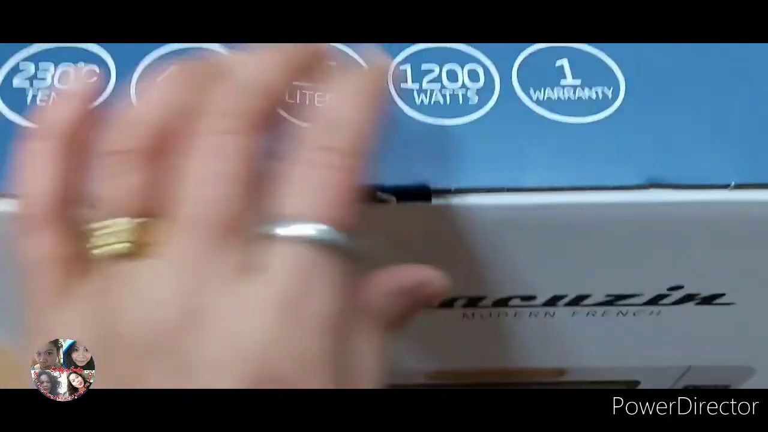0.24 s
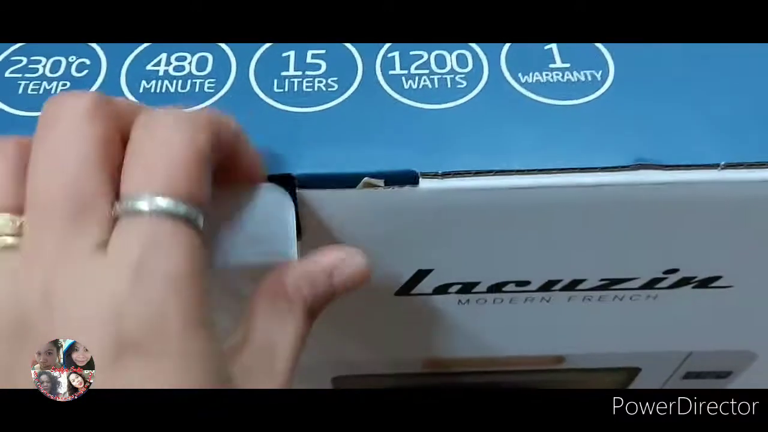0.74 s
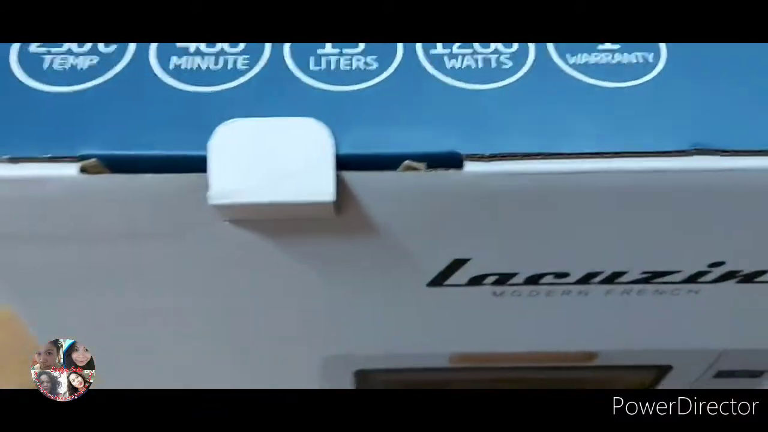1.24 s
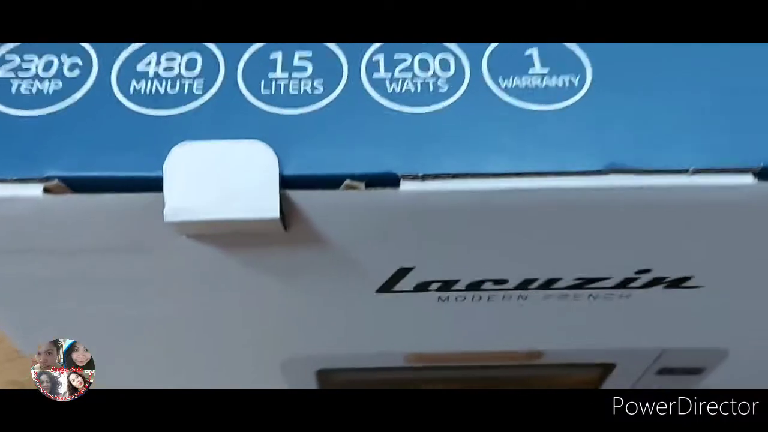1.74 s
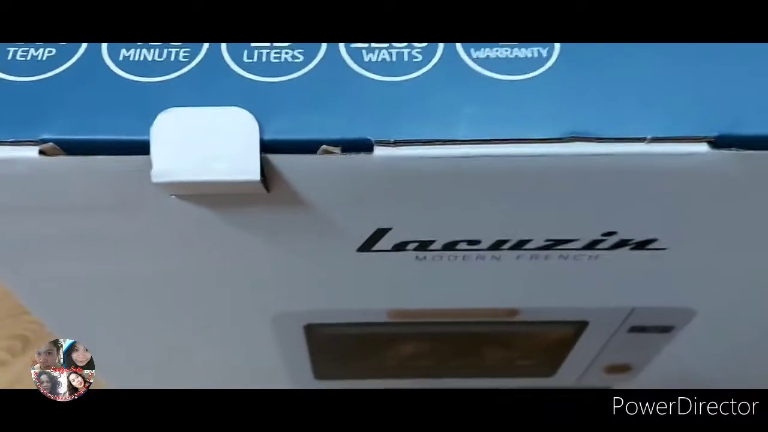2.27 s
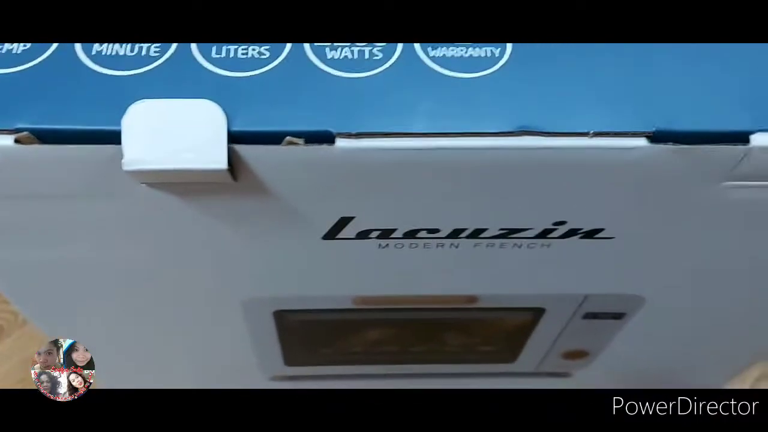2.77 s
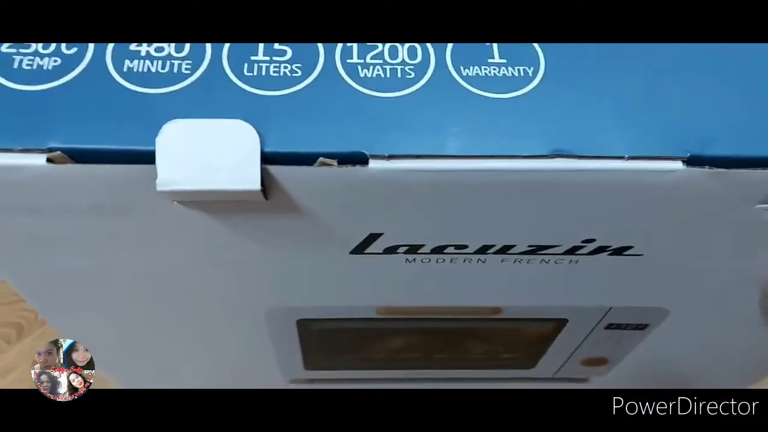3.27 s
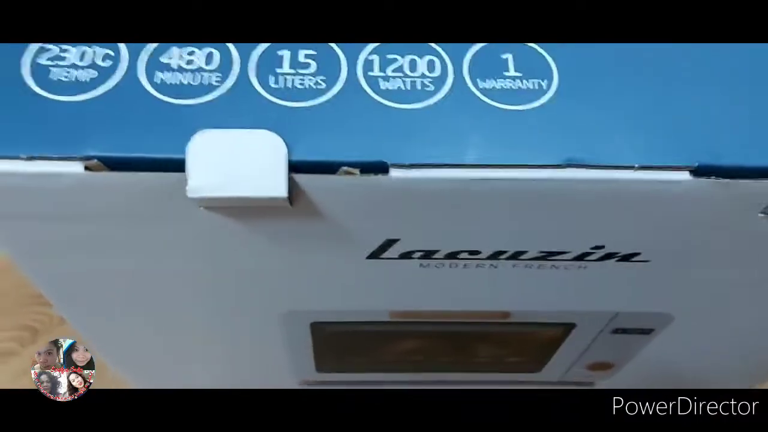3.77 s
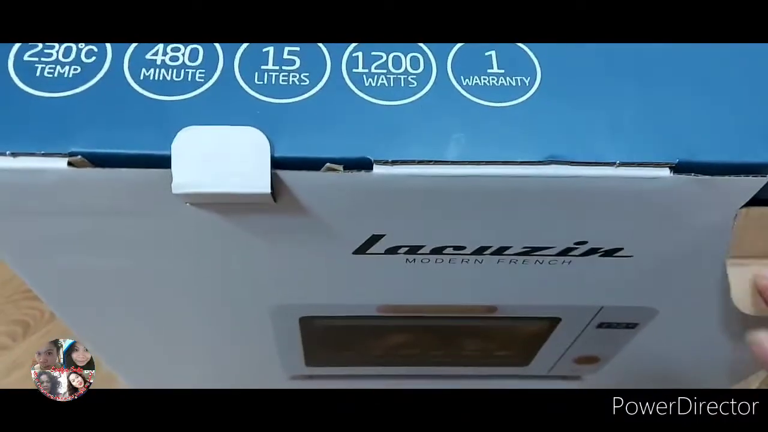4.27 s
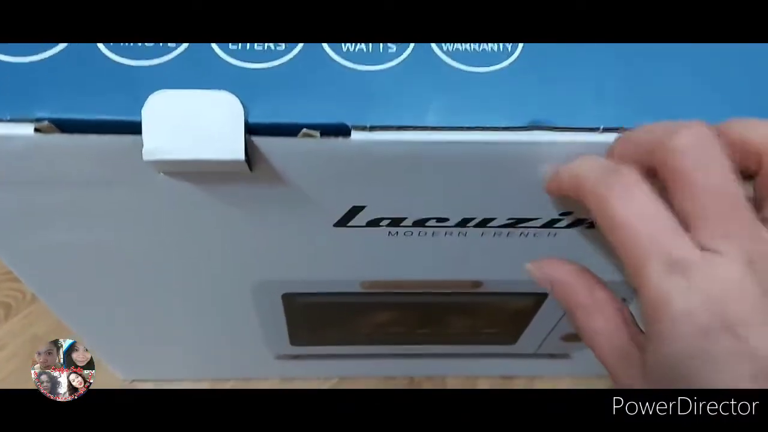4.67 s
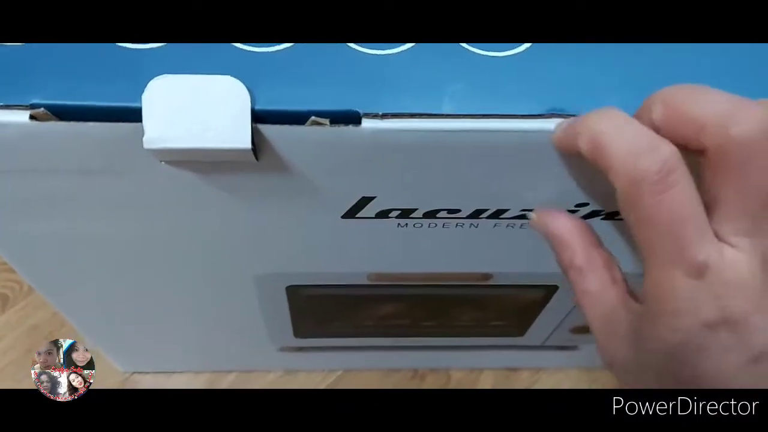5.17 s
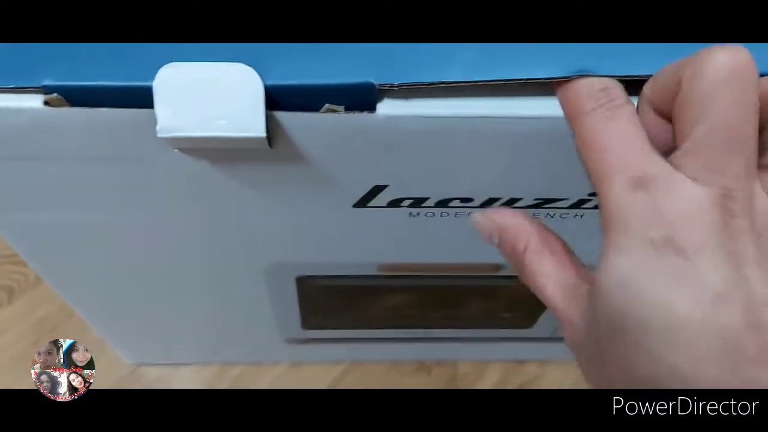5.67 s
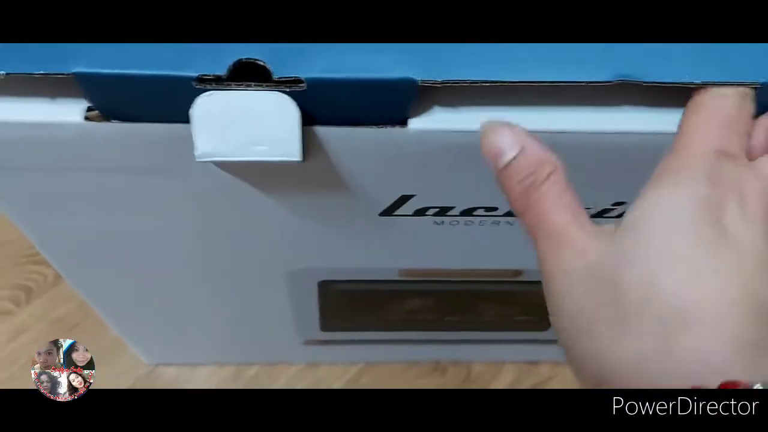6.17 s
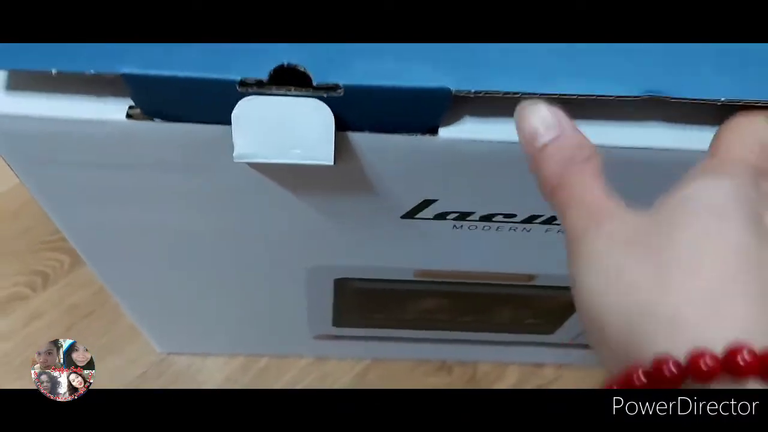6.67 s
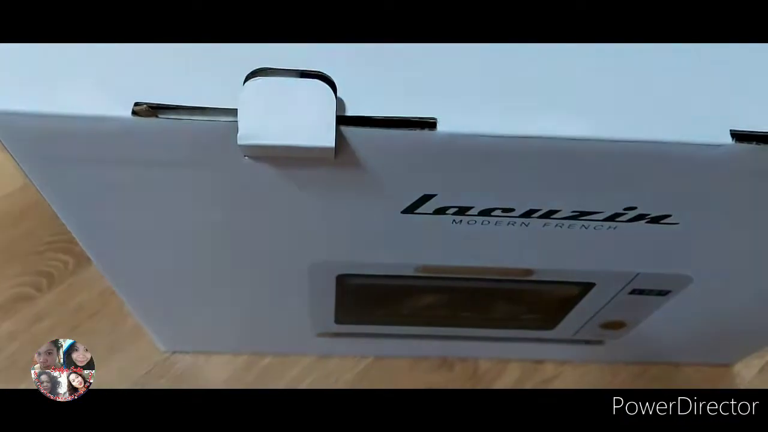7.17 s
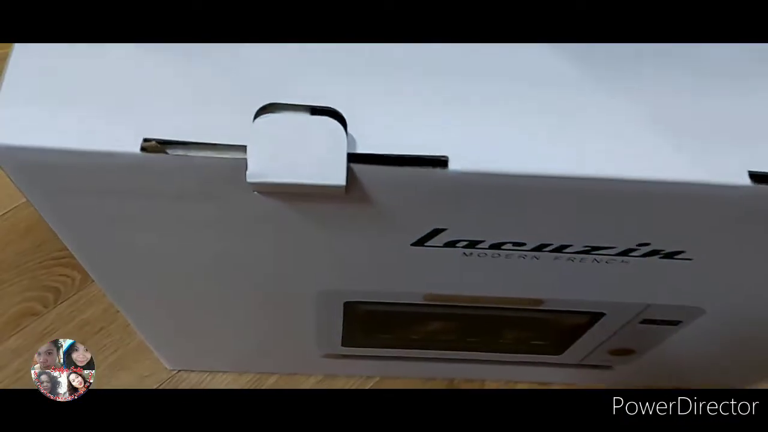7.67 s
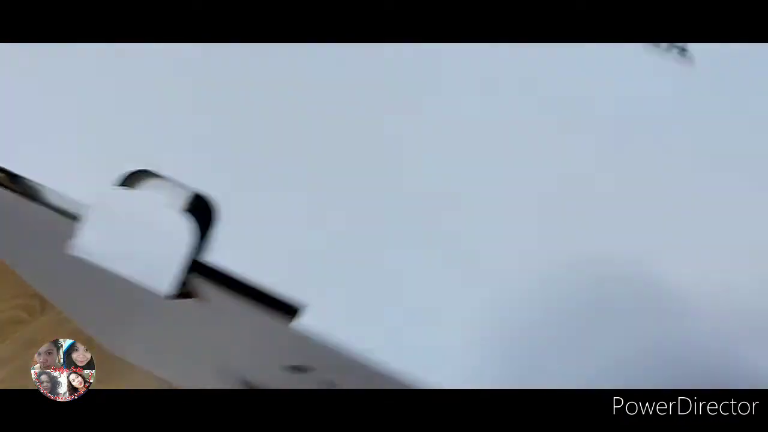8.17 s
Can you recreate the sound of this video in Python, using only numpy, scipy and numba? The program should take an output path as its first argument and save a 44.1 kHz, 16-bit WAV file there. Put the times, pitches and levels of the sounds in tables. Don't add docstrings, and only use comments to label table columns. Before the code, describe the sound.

Close phone pickup in a small, quiet, slightly live room with faint hiss. At 0 s a dull knock and sharp crack hit a hollow cardboard box, fading quickly; a small click follows at 0.2. From 0.8 to 1.1 s a low thump, papery rubbing and several crisp snaps free a tab. Then it is mostly quiet until 3.2: faint rubbing, creases, tiny fold clicks and soft wall pops. At 3.3-3.6 cracks build to a loud tearing snap, hollow knock and scrape; smaller knocks, a dry click and a bright chirp follow until 4.3. Very soft handling lasts until about 5.6. Hard cracks at 5.75-5.95 bring a lid chirp, low groan and booming panels. Lighter rubs and knocks continue, then from 6.9 to 8 come frequent snaps, gritty rasps and low thuds. A long bright drag from 8.2 ends with two quick snaps near 8.4.

```python
import sys
import numpy as np
from scipy import signal
from scipy.fft import rfft, irfft
from scipy.io import wavfile
from scipy.ndimage import uniform_filter1d
from numba import njit

SR = 44100
rng = np.random.default_rng(int(sys.argv[2]) if len(sys.argv) > 2 else 0)


def gain_from_db(level_db):
    decades = np.asarray(level_db, float) / 20
    return 10 ** decades


def transcribe(signal):
    frames = np.atleast_2d(signal).T
    limited = np.clip(frames, -1, 1)
    pcm = np.round(limited * 32767).astype(np.int16)
    wavfile.write(sys.argv[1], SR, pcm)


N = 371763


def unit(x):
    return x / np.sqrt(np.mean(x ** 2))


def curves(table):
    s, *columns = np.transpose(table)
    return [np.interp(np.arange(N) / SR, s, c) for c in columns]


def band(x, hz, width_hz):
    b, a = signal.iirpeak(min(hz, .45 * SR), hz / width_hz, SR)
    return signal.lfilter(b, a, x)


@njit
def moving_band(x, hz, k):
    y, band_state, low_state = np.empty(len(x)), 0., 0.
    for i in range(len(x)):
        g = np.tan(np.pi * hz[i] / SR)
        v = (band_state + g * (x[i] - low_state)) / (1 + g * (g + k))
        band_state = 2 * v - band_state
        low_state += 2 * g * v
        y[i] = k * v
    return y


def body(x, modes):
    out = 0
    for k, (hz, width_hz, db) in enumerate(modes):
        out = out + (-1) ** k * gain_from_db(db) * band(x, hz, width_hz)
    return out


def slips(rate_hz, spread_db):
    when = rng.random(N) < rate_hz / SR
    strength_db = spread_db * np.minimum(rng.exponential(size=N), 3)
    return unit(when * rng.standard_normal(N) * gain_from_db(strength_db))


def flicker(rate_hz):
    k = int(SR / rate_hz)
    held = np.repeat(rng.standard_normal(N // k + 1), k)
    return 1.08 * uniform_filter1d(held, k)[:N]


def patchy(x, modes, patchy_db):
    out = 0
    for hz, width_hz, db in modes:
        struck = x * rng.choice([-1, 1], N)
        ring = band(band(struck, hz, width_hz), hz, 3 * width_hz)
        out = out + gain_from_db(db + patchy_db * flicker(18)) * ring
    return unit(out)


def strokes(rows, linger, resting_db):
    t = np.arange(0, N + 64, 64) / SR
    s, db, rise_s, fall_s = np.transpose(rows)[:, :, None]
    slope = np.where(t < s, (s - t) / np.abs(rise_s), (t - s) / np.abs(linger * fall_s))
    power = np.sum(gain_from_db(db - 20 * slope ** 1.13) ** 2, axis=0) + gain_from_db(resting_db) ** 2
    return np.interp(np.arange(N) / SR, t, np.sqrt(power))


def spread(x, other, alike):
    port_lag_s = .00012
    alike = np.clip(alike, 0, 1)
    return np.array([np.roll(x, int(port_lag_s * SR)), alike * x + np.sqrt(1 - alike ** 2) * other])


def pan(db):
    return gain_from_db(np.array([db, -db]) / 2)


def add(out, s, sound):
    i = int(s * SR)
    out[..., i:i + sound.shape[-1]] += sound[..., :N - i]


# (frequency [Hz], density [dB per Hz])
AIR_SPECTRUM = [(18, -36.5), (206, -16), (388, -1), (547, -13.5), (953, -10.5), (1620, -34), (7280, -14.5),
                (15000, -41)]


def air():
    level_db = -71
    hz = np.fft.rfftfreq(N, 1 / SR) + 1
    table_hz, table_db = np.transpose(AIR_SPECTRUM)
    gain = gain_from_db(np.interp(np.log(hz), np.log(table_hz), table_db))
    mid, side = rfft(rng.standard_normal((2, N))) * gain
    side = side * np.minimum(hz / 1200, 1)
    return unit(irfft(np.array([mid + side, mid - side]), N)) * gain_from_db(level_db)


# (time [s], peak level [dB], pitch [Hz])
KNOCKS = [(0.009, -21, 270), (0.63, -46, 90), (0.813, -26, 82), (3.536, -16, 295), (3.866, -38.5, 352),
          (3.944, -26.5, 159), (4.195, -30.5, 386), (5.275, -31.5, 366), (5.849, -22, 408),
          (5.934, -22.5, 401), (6.213, -33, 81.6), (6.425, -32, 205), (6.488, -34, 716), (6.64, -37.5, 576),
          (6.87, -29, 447), (7.083, -24, 125), (7.305, -24.5, 58), (7.005, -33, 55), (7.118, -28, 65),
          (7.148, -30, 72), (7.565, -27, 205), (7.572, -29, 95), (7.7, -32, 60), (7.775, -30, 130),
          (7.868, -26, 54), (7.522, -22.5, 309), (7.737, -18, 284.5), (7.852, -27, 113),
          (7.975, -34.5, 576)]


def knocks():
    out, t = np.zeros(N), np.arange(SR // 4) / SR
    attack = 1 - np.exp(-t / 0.00043)
    for s, db, hz in KNOCKS:
        ring_s = 0.085 + 4 / hz
        fade = np.exp(-np.log(1000) * t / ring_s) * attack
        modes = np.sin(2 * np.pi * hz * t) + 0.33 * np.sin(2 * np.pi * 1.5 * hz * t)
        add(out, s + 0.00263, gain_from_db(db - 3.5) * fade * modes)
    return out


# (time [s], free flap resonance [Hz], left minus right [dB])
GRIP = [(0.0, 2990, 0.5), (0.84, 2884, 0), (1.03, 5470, -0.6), (1.55, 3510, 4), (1.78, 5070, 12),
        (2.42, 3460, -3), (3.31, 5210, 9.5), (3.75, 3250, 4), (4.65, 3170, 8), (4.81, 5240, 8.5),
        (6.4, 3015, 6.5), (6.86, 5420, 5.5), (7.32, 1818, 2.5), (8.2, 4610, 6)]


def grip():
    return curves(GRIP)


# (time [s], peak level [dB], colour [Hz], panel share [dB], left minus right [dB])
TICKS = [(5.7514, -16, 6940, -25, 8.9), (5.8518, -3.5, 5700, -11, 6.1), (5.291, -36, 6000, -15, 6),
         (5.667, -26, 3000, -8, 5), (6.0745, -30, 2500, -2, 4), (6.445, -30, 2000, 2, 4),
         (6.677, -36, 7000, -20, 6), (6.63, -41, 7000, -20, 6), (0.9168, -29, 3280, -4.5, -9),
         (1.0095, -12, 6900, -9.5, -0.5), (1.0845, -6, 6300, -18, 0), (2.174, -40, 2500, -14, 0),
         (2.548, -42, 1800, -14, 0), (3.759, -40, 11000, -30, 4), (4.1235, -41, 9000, -30, 5),
         (6.9195, -22, 5500, -20, 6), (3.556, -14, 4500, -20, 6), (3.2445, -31, 3370, -20.5, 4),
         (3.3369, -11, 6200, -35, 8), (3.4234, -22, 6920, -11, 17.5), (3.5184, -14.5, 6390, -23, -5),
         (6.4915, -26.5, 2530, 2, 7), (8.383, -13, 5640, -19, 6), (8.391, -12, 7000, -19, 6)]
# (time [s], peak level [dB], colour [Hz], panel share [dB], left minus right [dB])
CRACKS = [(0.8123, -26, 7800, -12, 0), (7.722, -34, 9000, -25, 3), (3.5054, -8.5, 7500, -25, 9),
          (6.901, -11, 9250, -22, 8), (1.0785, -20, 1500, 0, 0), (1.0633, -28, 7400, -8, 1.5),
          (3.8776, -32, 8130, -25, 2), (7.2745, -25, 1800, -12, 3.5), (7.1034, -22, 2500, -12, 4),
          (7.132, -25, 4700, -14, 4), (0.0237, -8, 4650, -8.5, 1.7), (0.85, -24, 3570, -12, 6.8),
          (3.3764, -28.5, 7960, -16, 5), (3.4, -21.5, 4870, -8, 3.3), (3.8304, -30, 4230, -46, 1.6),
          (5.9714, -15.5, 2500, -7.5, 3.3), (5.9864, -17.5, 5060, -22, 7), (7.2994, -19.5, 7400, -17, 5),
          (7.7385, -24, 5130, -2, 2.7), (7.8413, -25, 6070, -12.5, 3)]
# (time [s], peak level [dB], colour [Hz], panel share [dB], left minus right [dB])
TEARS = [
    (3.5418, -3.5, 5400, -11.5, 7.5),
    (4.2761, -25, 10560, -38, 7),
    (5.9279, -9.5, 2710, -9, 5.5),
    (6.1606, -24.5, 5340, -13.5, 12),
    (6.333, -30, 7140, -8, 6),
    (7.0963, -20, 2500, -12, 5),
    (7.9758, -20.5, 2500, -13, 3),
]
# (time [s], peak level [dB], panel share [dB])
CREASES = [(0.4823, -41.5, -50), (0.8699, -26.5, -4.5), (2.142, -34, -25), (2.612, -39.5, -19),
           (3.2704, -35, -4), (3.3223, -34.5, -4.5), (3.4484, -30, -14), (3.9496, -29, -19),
           (4.083, -43.5, 6), (4.5695, -36, -37), (4.7284, -41, 1), (4.8237, -43.5, 2), (5.2769, -35.5, -2),
           (5.3244, -34.5, -23), (6.4278, -33.5, -10), (5.375, -40, -25), (6.54, -39, -19),
           (6.5775, -31.5, -20), (0.6926, -47, -10), (0.759, -45, -10), (2.957, -46, -6),
           (3.1318, -46, -25), (3.2979, -38, -8), (3.7254, -42, -20), (3.7948, -45, -25),
           (4.2542, -32, -15), (6.843, -33, -12), (6.8709, -25, -8), (7.2451, -32, -10), (7.5185, -30, -8),
           (7.611, -32, -12), (8.0882, -31, -15) ]


def every_snap():
    flap_hz, pan_db = grip()
    creases = []
    for s, db, panel_db in CREASES:
        i = int(s * SR)
        creases.append((s, db, 1.13 * flap_hz[i], panel_db, pan_db[i]))
    kinds_ms = (TICKS, 1.05), (CRACKS, 1.75), (TEARS, 4), (creases, 1.9)
    return [(*row, ms) for rows, ms in kinds_ms for row in rows]


# (frequency [Hz], width [Hz], level [dB])
PANELS = [(308.4, 114, -7.5), (381, 59, -1), (603, 170, -11.5), (733, 60.4, -2), (810.5, 42.3, -4.5),
          (1042, 210, -10), (1414, 138, -12.5), (1730, 320, -19)]


def snaps():
    crack, blow = np.zeros((2, N)), np.zeros((2, N))
    t = np.arange(4096) / SR
    flutter_gain = gain_from_db([[-26], [-26], [-36], [-36]])
    for s, db, hz, panel_db, pan_db, ms in every_snap():
        age = t * 1000 / ms
        shape = age ** 1.3 * np.exp(-age * 1.05)
        flutter = flutter_gain * np.exp(-t / 0.03) * np.minimum(age, 1)
        burst = rng.standard_normal((4, len(t))) * (shape + flutter)
        burst[:, int(shape.argmax())] += 3.5 * shape.max()
        edge = burst[:2]
        tone = band(edge, hz, 0.31 * hz) + 0.12 * np.diff(edge, prepend=0) + 0.16 * edge
        tone = tone / np.abs(tone).max(axis=1)[:, None]
        recoil = spread(burst[2], burst[3], alike=0.8) / np.linalg.norm(burst[2])
        start_s = s - .0004 - ms * .0006
        add(crack, start_s, tone * gain_from_db(db - 1.0) * pan(pan_db)[:, None])
        add(blow, start_s, recoil * gain_from_db(db + panel_db))
    held = [(hz, 1.75 * width_hz, db) for hz, width_hz, db in PANELS]
    return crack + gain_from_db(43) * body(blow, held)


# (time [s], length [s], colour [Hz], level [dB])
RASPS = [(0.024, .025, 1000, -28), (0.03, .06, 2100, -40), (0.872, .035, 2000, -45),
         (6.489, .008, 950, -28), (2.2, .14, 1300, -63), (0.85, .02, 2100, -45), (0.915, .04, 2600, -48),
         (1.09, .04, 6000, -42), (1.66, .14, 1100, -65), (1.8, .14, 1300, -64), (2.71, .09, 1200, -67),
         (3.54, .05, 2100, -31), (3.832, .05, 4500, -49), (4.445, .1, 620, -64), (4.571, .06, 3100, -52),
         (5.325, .07, 4200, -55), (5.6, .08, 1700, -50), (5.925, .05, 1900, -33), (6.163, .05, 5500, -46),
         (6.94, .03, 4500, -42), (6.972, .03, 2700, -43), (7.095, .05, 2500, -37), (7.228, .03, 1200, -46),
         (7.26, .035, 2000, -40), (7.53, .06, 2200, -44), (7.61, .03, 2000, -45), (7.66, .04, 3800, -45)]
# (time [s], length [s], pitch [Hz], level [dB])
SCUFFS = [
    (3.539, 0.093, 2055, -33),
    (4.275, 0.01, 1450, -37.5),
    (4.829, 0.16, 800, -64),
    (5.208, 0.2, 384, -61.5),
    (5.923, 0.031, 1740, -25.5),
    (6.002, .11, 736, -35.5),
    (7.099, 0.093, 1380, -41.5),
    (7.268, 0.015, 1800, -39),
    (8.218, 0.25, 8000, -36),
]


def scuffs():
    out = np.zeros((2, N))
    for rows, share in ((SCUFFS, .097), (RASPS, .45)):
        for s, length_s, hz, db in rows:
            t = np.arange(SR // 4) / SR / length_s
            friction = rng.standard_normal((2, len(t)))
            sing = band(band(friction, hz, share * hz), hz, share * hz)
            shape = np.minimum(8 * t, 1) * np.exp(-2 * t ** 2)
            add(out, s, gain_from_db(db) * unit(spread(*sing, alike=500 / hz)) * shape)
    return out


# (peak time [s], panel level [dB], 20 dB rise [s], 20 dB fall [s], boom level [dB])
TAB_SHOVES = [(0.028, -26, 0.05, 0.08, -28), (0.2, -64, .1, 0.53, -62.5), (0.708, -58, 0.071, 0.084, -44),
              (0.833, -39.5, 0.054, 0.17, -35), (0.94, -40, 0.2, 0.18, -62),
              (1.088, -36.5, 0.12, .085, -39), (1.37, -75, 0.08, 0.55, -56.5),
              (1.57, -55.5, .035, .1, -44.5), (1.95, -65, 0.27, 0.095, -55), (2.24, -55, 0.15, 0.3, -60),
              (2.52, -60, 0.13, 0.16, -58), (2.75, -67, 0.15, .15, -75)]
# (peak time [s], panel level [dB], 20 dB rise [s], 20 dB fall [s], boom level [dB])
SIDE_SHOVES = [(2.97, -52.5, 0.028, .11, -48), (3.18, -58, 0.025, .04, -56), (3.337, -43, 0.091, 0.51, -47),
               (3.46, -39.5, 0.14, 0.15, -49), (3.556, -23, .02, .1, -29.5),
               (3.876, -75, 0.034, 0.085, -48.5), (3.954, -41.5, 0.0069, 0.089, -34.5),
               (4.046, -46.5, 0.11, 0.23, -49.5), (4.205, -65, 0.026, 0.074, -38),
               (4.27, -39, 0.048, 0.038, -59.5), (4.739, -47, 0.044, 0.1, -57),
               (4.849, -59.5, 0.13, 0.42, -67), (5.288, -47.5, .025, 0.12, -41.5)]
# (peak time [s], panel level [dB], 20 dB rise [s], 20 dB fall [s], boom level [dB])
LID_SHOVES = [(5.648, -29, 0.12, 0.17, -40.5), (5.87, -28, .015, 0.19, -49),
              (5.961, -24, 0.059, 0.14, -32.5), (6.221, -39.5, 0.18, 0.18, -43.5),
              (6.44, -41, 0.032, 0.35, -50.5), (6.66, -42, 0.05, 0.1, -45.5),
              (6.914, -31, 0.11, .12, -35.5), (7.1, -33, 0.013, 0.16, -39), (7.16, -37.5, 0.12, .045, -48),
              (7.31, -38.5, 0.14, 0.3, -46), (7.558, -31, 0.081, 0.12, -35),
              (7.743, -30, 0.0084, 0.091, -27.5), (7.87, -37.5, 0.046, 0.094, -43),
              (7.983, -36.5, 0.0081, 0.11, -57), (8.05, -58, 0.15, 0.38, -44.5),
              (8.196, -39.5, .3, .3, -48), (8.311, -32.5, 0.095, 0.96, -37.5)]
# (frequency [Hz], width [Hz], level [dB])
BOOM = [(51.8, 4.7, 1), (78.4, 42, 6), (165.3, 64, 1), (196, 89, -3)]


def shaking():
    shoves = TAB_SHOVES + SIDE_SHOVES + LID_SHOVES
    panel_rows = [(s, db, rise_s, fall_s) for s, db, rise_s, fall_s, boom_db in shoves]
    boom_rows = [(s, boom_db, rise_s, fall_s) for s, db, rise_s, fall_s, boom_db in shoves]
    panel = strokes(panel_rows, linger=1, resting_db=-85)
    boom = strokes(boom_rows, linger=1.07, resting_db=-71.5)
    creak = patchy(np.array([slips(1200, 2.4), slips(1200, 1.5)]), PANELS, 3.2)
    push = patchy(np.array([slips(3000, .6), slips(3000, .6)]), BOOM, 1.3)
    panel_sound = gain_from_db(-5.5) * panel * spread(*creak, alike=0.85)
    boom_sound = gain_from_db(-0.9 + 1.8 * flicker(22)) * boom * spread(*push, alike=0.9)
    return panel_sound + boom_sound


# (peak time [s], hiss level [dB], 20 dB rise [s], 20 dB fall [s], brightness [dB])
TAB_RUBS = [(0.035, -36, .1, .09, -5.5), (4.95, -59.5, 0.11, 0.065, -4.5), (0.494, -59.5, 0.033, 0.17, -7),
            (0.925, -43.5, 0.22, .055, -7), (1.018, -40.5, 0.073, 0.1, -2), (1.088, -39, 0.026, 0.072, -15),
            (1.43, -57, 0.13, 0.87, -5.5), (1.74, -61, 0.18, 0.98, 0), (1.98, -53.5, 0.8, 0.066, -1),
            (2.14, -50, 0.061, 0.27, -4.5), (2.524, -55, 0.086, 0.14, 0.5), (3.05, -61, 0.53, 0.51, -1)]
# (peak time [s], hiss level [dB], 20 dB rise [s], 20 dB fall [s], brightness [dB])
SIDE_RUBS = [(3.285, -48, .035, 0.74, -24), (3.43, -41.5, 0.12, 0.13, -5), (3.545, -26.5, 0.025, 0.091, 0),
             (3.74, -58, .1, .1, -2), (3.838, -44, 0.008, 0.1, -12), (3.88, -49, .03, .06, 0),
             (4.045, -50, 0.23, 0.2, 0), (4.271, -46.5, 0.1, 0.095, -6.5), (4.48, -61, 0.046, 0.13, 8.5),
             (4.574, -50.5, 0.0082, 0.092, -12), (4.754, -56.5, 0.1, 0.067, -4),
             (4.861, -56.5, 0.08, 0.029, 6), (5.284, -52, 0.0086, 0.044, -3), (5.36, -50, 0.065, .1, -6)]
# (peak time [s], hiss level [dB], 20 dB rise [s], 20 dB fall [s], brightness [dB])
LID_RUBS = [(5.58, -44.5, 0.1, 0.67, -2.5), (5.65, -42, 0.14, 0.1, -6), (5.762, -38.5, 0.12, 0.055, -2.5),
            (5.862, -39, 0.022, 0.17, -8), (5.933, -24, 0.02, 0.07, -2.5), (5.968, -29, .05, .04, -2),
            (5.13, -62, .04, .04, 0), (6.06, -43, 0.18, 0.058, 0), (6.171, -46.5, 0.034, 0.3, -1.5),
            (6.341, -51.5, 0.14, 0.047, -1.5), (6.439, -49, 0.032, 0.049, -0.5),
            (6.548, -52.5, 0.13, 0.17, -2), (6.67, -49, 0.14, 0.25, -2.5), (6.88, -36, 0.05, 0.16, -2),
            (6.948, -37, .06, .07, 0), (6.99, -39, 0.07, 0.09, 1.5), (7.137, -35, .03, .07, -4),
            (7.106, -30, 0.03, 0.05, -4), (7.282, -34, 0.051, 0.061, -1), (7.393, -46.5, 0.059, 0.048, 2),
            (7.555, -41.5, 0.13, 0.15, 4), (7.62, -43, .02, .1, -3), (7.668, -39, .04, .08, 4),
            (7.695, -41, 0.06, 0.03, 4), (7.801, -43, 0.034, 0.054, 6.5), (7.86, -44.5, 0.04, 0.11, 4),
            (7.915, -47, .06, .05, 4), (8.035, -46, .08, .08, 2), (7.984, -48, .008, 0.22, 4),
            (8.19, -38, .1, .3, 1), (8.265, -34, 0.15, 0.45, -1.5), (8.39, -37, .3, .3, -2)]
# (frequency [Hz], width [Hz], level [dB])
PAPER = [(1660, 1220, -5.5), (2500, 1800, -.5), (3130, 2700, -0.5), (4560, 1500, -6.5), (5330, 2100, 2),
         (6480, 1500, -4.5)]
# (frequency [Hz], width [Hz], level [dB])
SHEEN = [(8000, 880, -2), (8950, 6100, -6), (12770, 7200, -4), (13400, 2700, -13)]


def rubbing():
    rubs = TAB_RUBS + SIDE_RUBS + LID_RUBS
    resting_db = -77.5
    hiss = strokes([(s, db, rise_s, fall_s) for s, db, rise_s, fall_s, bright_db in rubs], 1, resting_db)
    shine = strokes([(s, db + bright_db, rise_s, fall_s) for s, db, rise_s, fall_s, bright_db in rubs],
                    1, resting_db)
    flap_hz, pan_db = grip()
    grit = gain_from_db(1.3 * flicker(45) + 1.2 * flicker(160))
    fibres = .05 * slips(400, 1.6)
    ports = np.array([slips(12000, 1.3), slips(12000, 1.3)]) + fibres
    flap = [unit(moving_band(x, flap_hz * gain_from_db(.3 * flicker(25)), .18)) for x in ports]
    paper = patchy(ports, PAPER, 3) + .6 * np.array(flap)
    sheen = patchy(ports, SHEEN, 2.2)
    low = gain_from_db(-2.0) * hiss * paper * pan(0.57 * pan_db)
    high = gain_from_db(-0.77) * shine * sheen * pan(1.08 * pan_db)
    return grit * (low + high)


# (time [s], peak level [dB], pitch [Hz])
TAPS = [(0.2085, -46, 250), (1.3405, -45, 170), (1.555, -48, 90), (1.913, -50, 150), (1.97, -49, 150),
        (2.108, -53, 110), (2.142, -41, 150), (2.174, -44, 125), (2.197, -47, 125), (2.222, -44, 140),
        (2.251, -46, 140), (2.307, -47, 125), (2.465, -52, 110), (2.487, -44, 137), (2.515, -47, 160),
        (2.539, -46, 140), (2.549, -44, 170), (2.614, -48, 137), (2.958, -46, 100), (2.98, -46, 120),
        (3.178, -49, 393), (6.765, -44, 172), (6.919, -27, 200), (7.256, -33, 396)]
# (time [s], peak level [dB])
CLICKS = [
    (0.208, -37),
    (1.34, -36),
    (1.9125, -40),
    (1.9695, -38),
    (2.1425, -42),
    (2.174, -43),
    (2.6145, -45),
    (3.951, -30),
]


def taps():
    out, t = np.zeros(N), np.arange(SR // 8) / SR
    ring_s, click_s = .06, .00006
    for s, db, hz in TAPS:
        fade = np.exp(-np.log(1000) * t / ring_s)
        add(out, s, gain_from_db(db) * fade * np.cos(2 * np.pi * hz * t - .6))
    for s, db in CLICKS:
        add(out, s, -gain_from_db(db) * np.exp(-t / click_s))
    return spread(out, 0 * out, alike=1)


@njit
def walls(x, lags, gain, damp):
    line, soft, out = np.zeros((8, 4096)), np.zeros(8), np.zeros((2, len(x)))
    for i in range(len(x)):
        total = 0.
        for k in range(8):
            soft[k] += (1 - damp) * (gain[k] * line[k, (i - lags[k]) & 4095] - soft[k])
            total += soft[k]
            out[k % 2, i] += soft[k]
        for k in range(8):
            line[k, i & 4095] = x[i] + soft[k] - total / 4
    return out


def scene():
    room_t60_s, room_db, room_damp = 0.37, -25.5, 0.55
    box = knocks() + snaps() + scuffs() + shaking() + rubbing() + taps()
    lags = rng.integers(400, 1800, 8)
    room = walls(box.mean(axis=0), lags, gain_from_db(-60 * lags / SR / room_t60_s), room_damp)
    return box + gain_from_db(room_db) * room + air()


def roll_off(x):
    return signal.sosfilt(signal.butter(12, 16600, fs=SR, output="sos"), x)


def record(dry):
    low_pass = signal.ellip(8, .5, 45, 15500, fs=SR, output="sos")
    mix = signal.sosfilt(low_pass, dry)
    return roll_off(mix)


dry = scene()
out = record(dry)
transcribe(out)
```